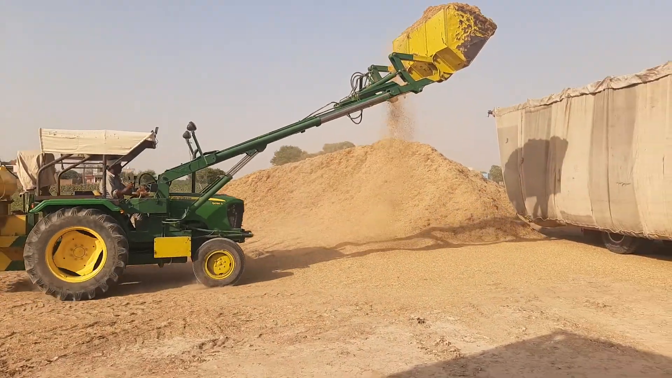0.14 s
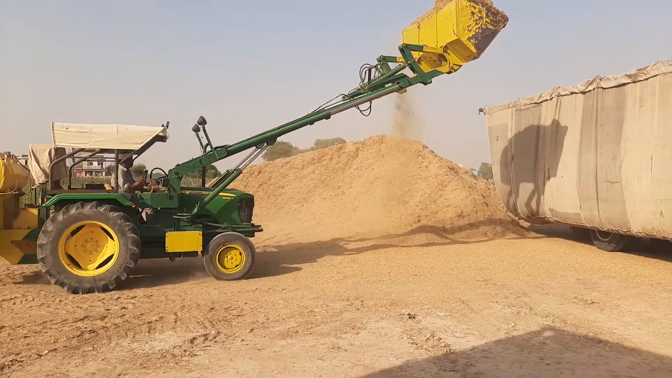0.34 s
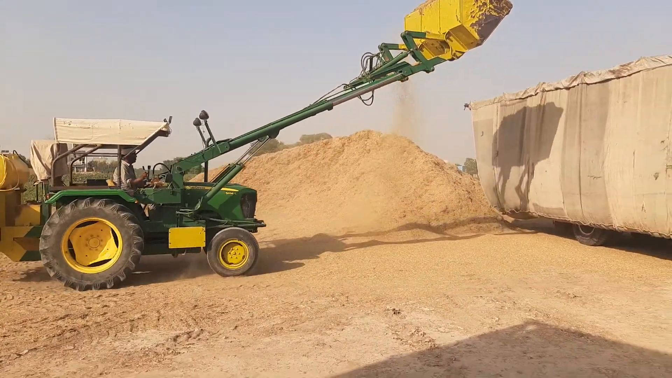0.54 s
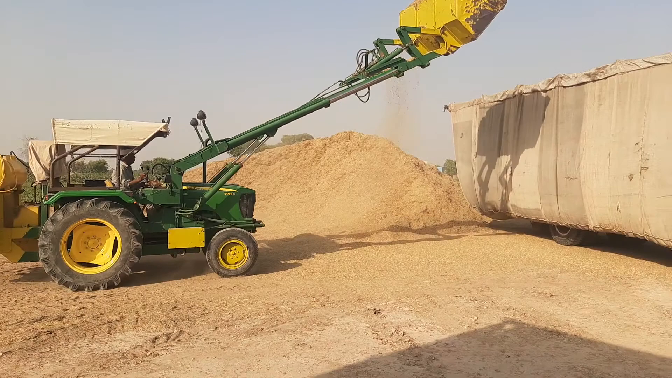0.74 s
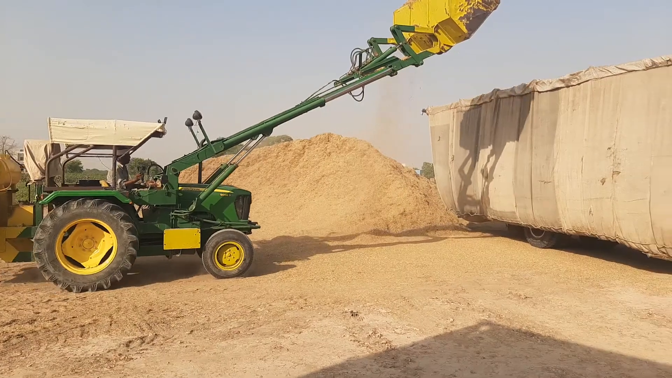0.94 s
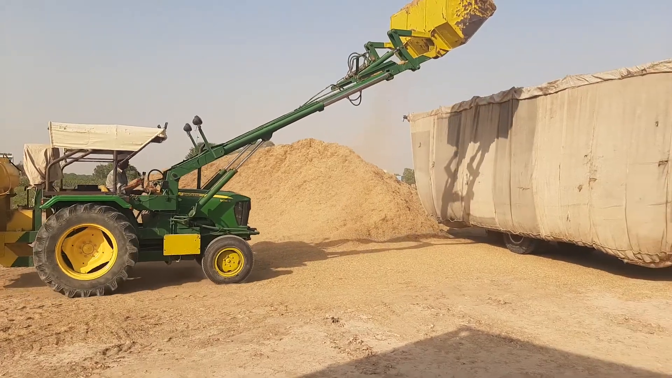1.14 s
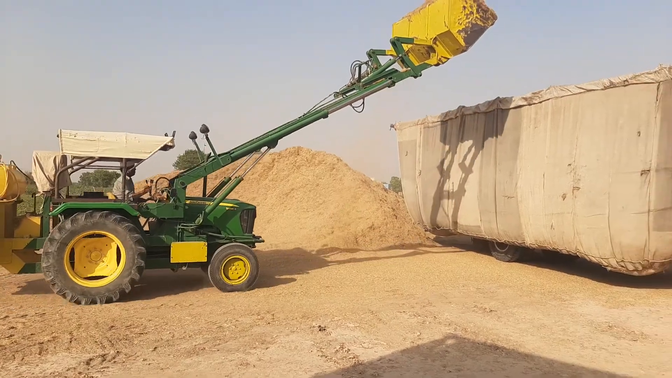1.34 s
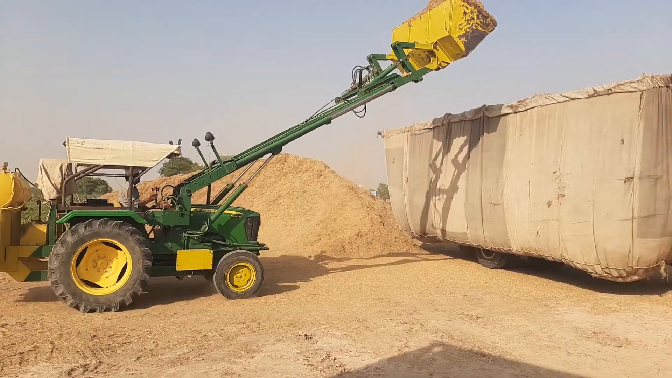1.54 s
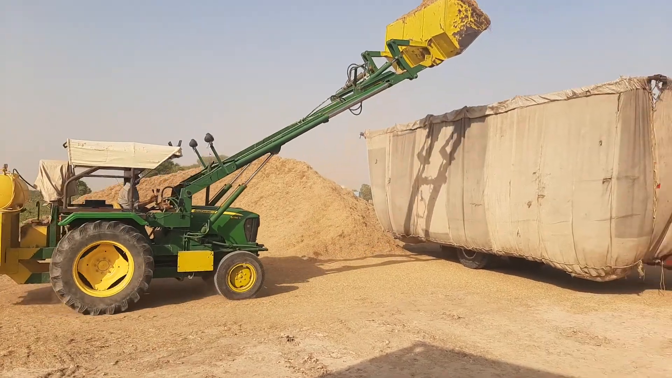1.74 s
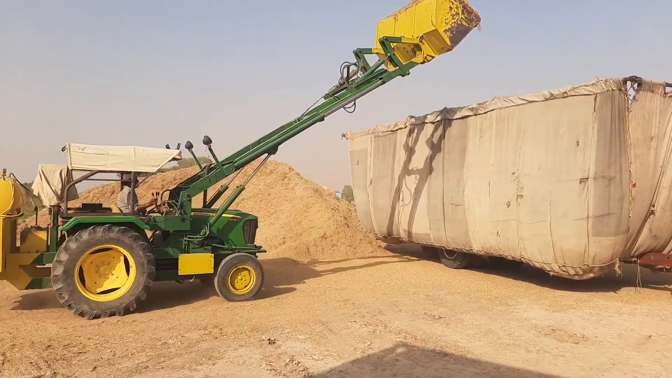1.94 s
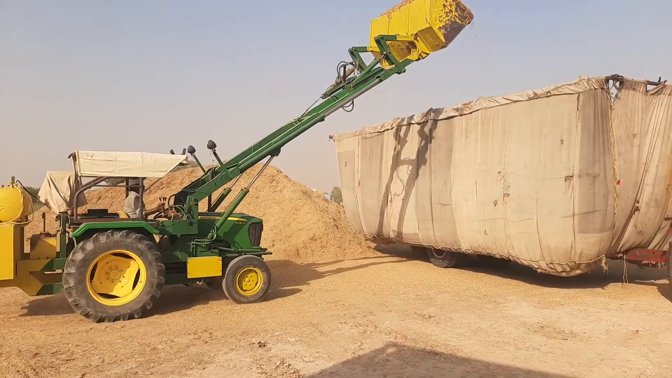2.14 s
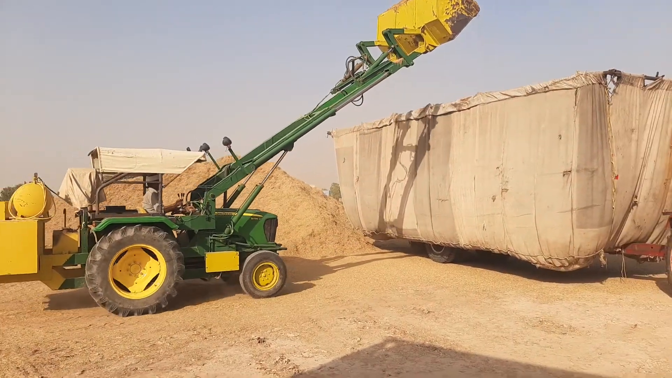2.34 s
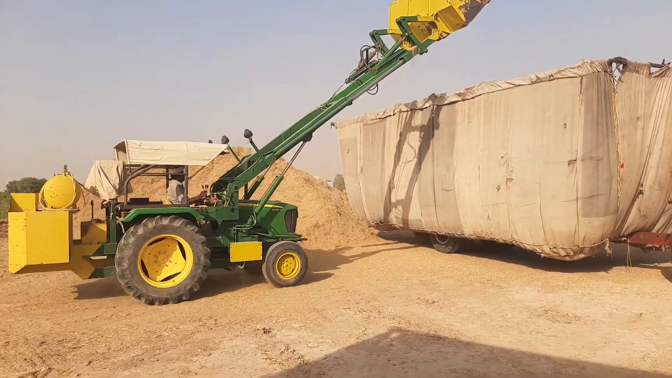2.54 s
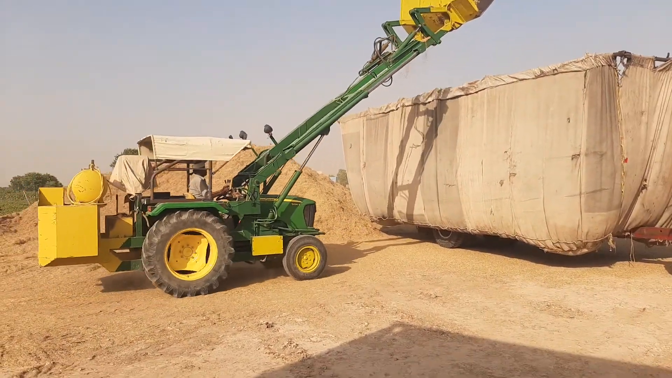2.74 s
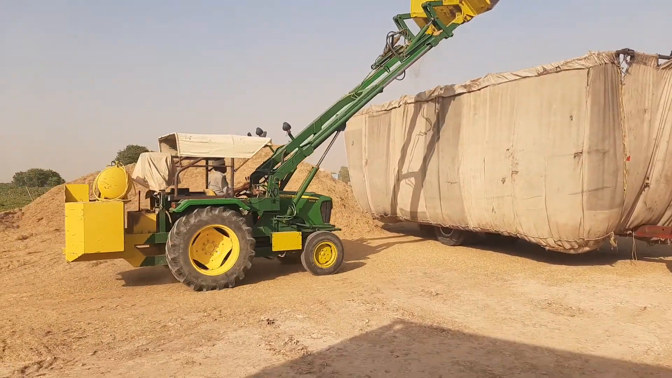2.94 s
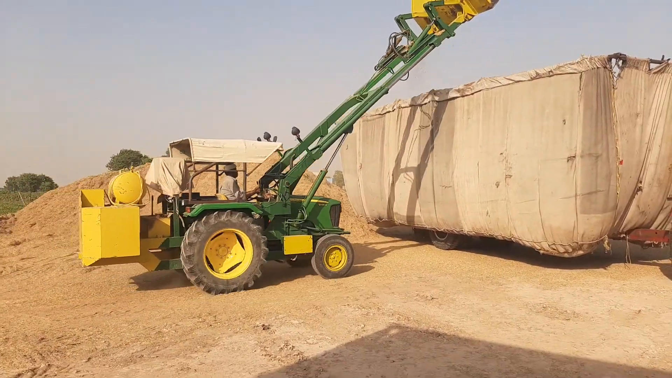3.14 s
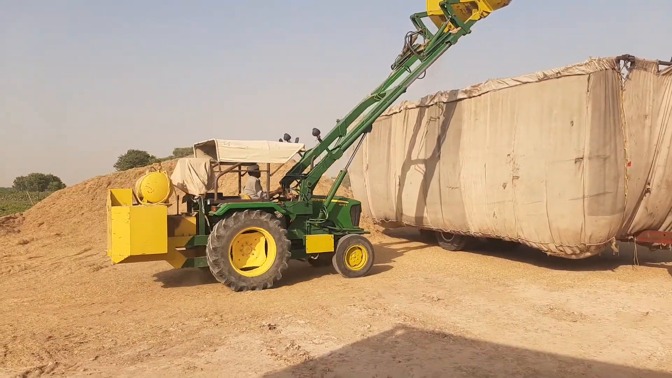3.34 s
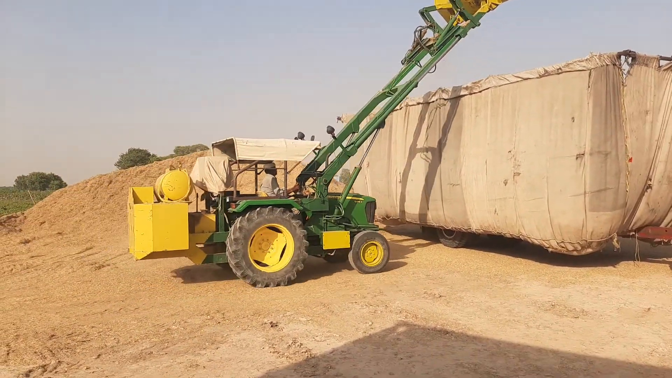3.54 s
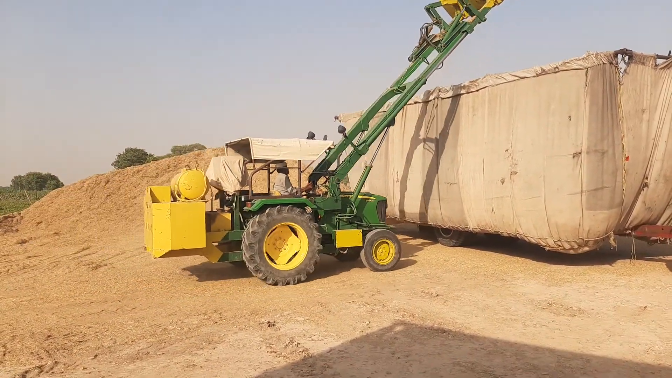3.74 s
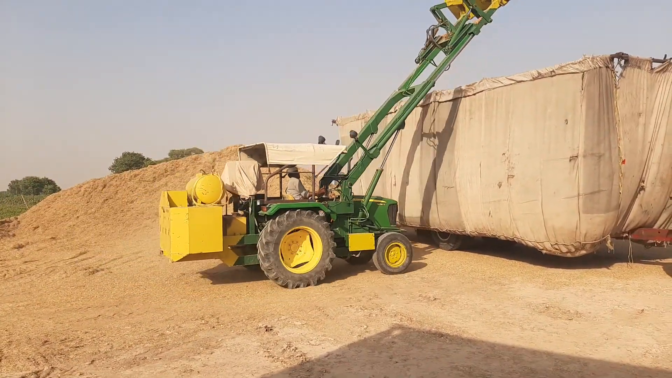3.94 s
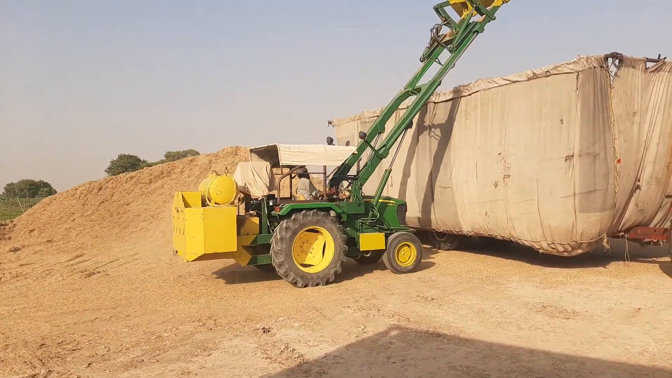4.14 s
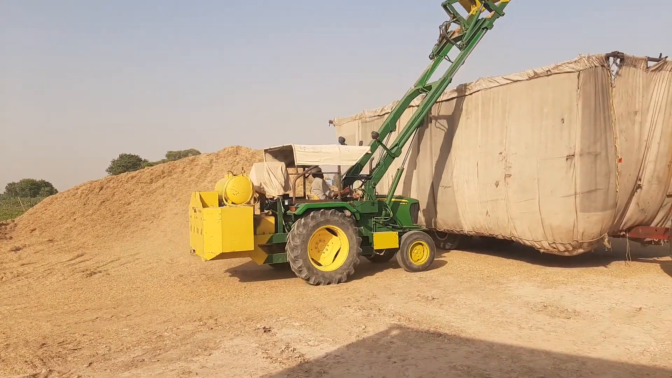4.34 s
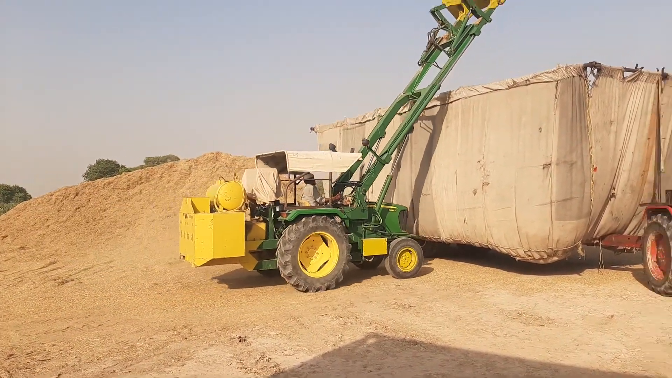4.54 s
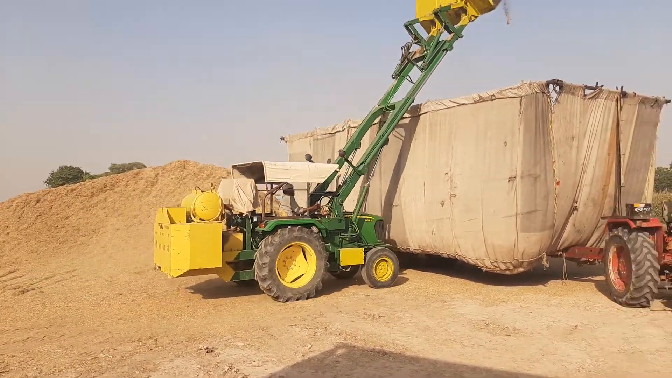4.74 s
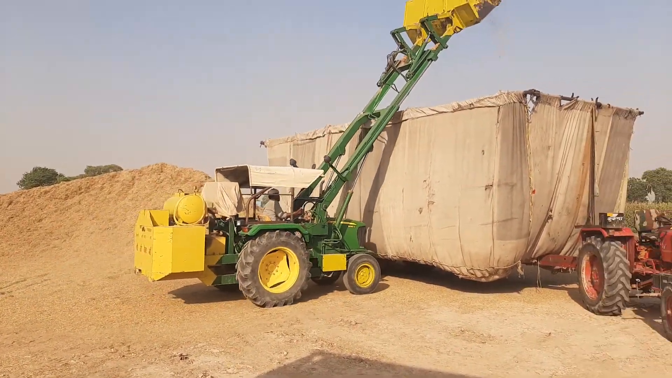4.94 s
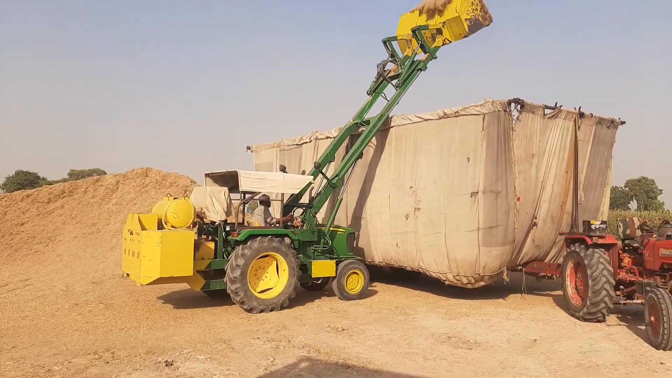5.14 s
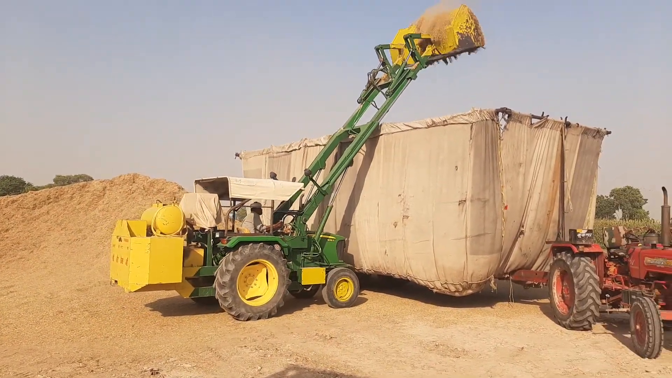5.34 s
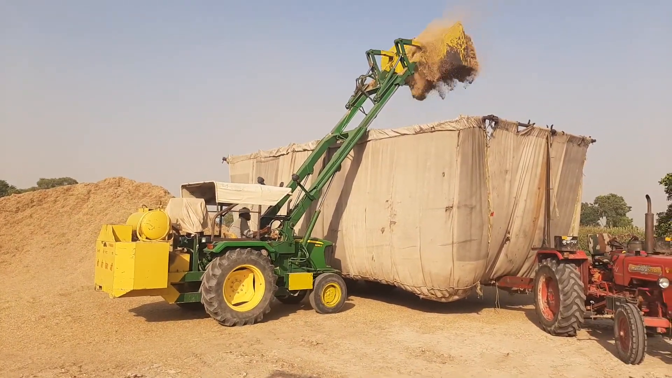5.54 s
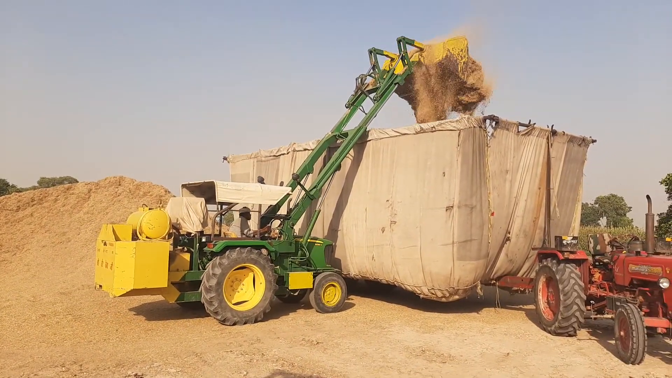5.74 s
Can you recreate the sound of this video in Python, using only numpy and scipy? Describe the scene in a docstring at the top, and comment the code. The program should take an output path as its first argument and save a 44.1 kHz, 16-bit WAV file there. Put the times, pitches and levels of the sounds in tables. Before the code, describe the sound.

In an open farm yard, a small three-cylinder tractor diesel pulls hard with a dense, buzzing exhaust throb, block clatter, ticking valves and wavering hydraulic whine. Just before four seconds the throttle is released and the pitch falls by half to an uneven idle. Loose loader joints clank dryly several times, then one faint squeak comes at the end. Handheld stereo microphone at moderate distance, dry, without reverberation.

```python
"""A three-cylinder tractor diesel pulls hard in an open farm yard, then the throttle is released
and it sinks to idle. Its exhaust throb is a set of sines locked to the firing rate, under a pump whine
of two gear tones. Rumble, block clatter and fan hiss are shaped noise that beats with the firings;
a loose tappet ticks, and the loader frame, struck by random knocks, clanks a few times as the load
comes off. One joint squeaks as a short sine."""
import sys
import numpy as np
from scipy import signal
from scipy.io import wavfile
from scipy.ndimage import uniform_filter1d

SR = 44100
rng = np.random.default_rng(int(sys.argv[2]) if len(sys.argv) > 2 else 0)


def nominal_scale(level):
    """Amplitude ratio for a level in decibels (scalar or array-like)."""
    x = np.asarray(level, float) / 20
    return 10 ** x


def file_out(sig):
    """Save sig as 16-bit WAV at sys.argv[1]."""
    # one column per channel
    cols = np.atleast_2d(sig).T
    # limit, then scale
    lim = np.clip(cols, -1, 1)
    pcm = np.round(lim * 32767).astype(np.int16)
    wavfile.write(sys.argv[1], SR, pcm)


N = 259308  # length in samples

RELEASE_S = 3.72  # the throttle is let go

# Governed speed under load, sagging as the loader works. Each row: time in seconds, firings per second in Hz.
GOVERNED_SPEED = [(0, 42.36), (.2, 42.23), (.75, 42.12), (.9, 42.03), (1.05, 41.67), (1.35, 42.02),
                  (1.5, 41.84), (1.8, 42.14), (1.95, 41.9), (2.2, 41.92), (2.4, 41.57), (2.7, 42.02),
                  (3.0, 41.95), (3.35, 41.36), (3.62, 41.38), (3.74, 40.7)]
# The tractor drives up to the trailer: times in seconds at which it is far, nearer, midway and close.
APPROACH_S = [0, 1.35, 2.202, 3.0]
# Strong exhaust lines. Each row: multiple of the firing rate, then level in dB when far, nearer, midway,
# close, just released and idling.
STRONG_LINES = [(1, -33, -34, -35, -34.5, -27.5, -68), (2, -19.5, -21.5, -24, -21, -30.5, -55),
                (3, -27.5, -25, -23.5, -25.5, -30, -47), (4, -21.5, -21, -24.5, -28, -40, -41),
                (5, -43, -45.5, -49, -40, -35, -46.5), (6, -40, -41, -44.5, -48, -41.5, -52.5),
                (11 / 3, -28.5, -29.5, -35.5, -35, -42, -62), (13 / 3, -28, -32, -38, -43, -40, -73),
                (14 / 3, -30.5, -31.5, -35.5, -36, -38, -66), (22 / 3, -45, -50, -45, -38.5, -48, -71),
                (9, -54, -66, -54, -47, -51, -62), (10, -67, -58, -41, -64, -55, -70.5)]
# Faint exhaust lines. Each row: multiple of the firing rate, level in dB pulling, level in dB idling.
FAINT_LINES = [(.33, -66, -70), (.67, -65, -76), (1.33, -45, -67), (1.67, -47, -67), (2.33, -45, -63),
               (2.67, -43, -61), (3.33, -43, -48), (5.33, -45, -51), (5.67, -46, -54), (6.33, -52, -46),
               (7, -51, -56), (7.67, -50, -57), (8.33, -48, -57), (9, -70, -56), (9.33, -51, -58),
               (9.67, -50, -55), (10, -70, -55), (11, -56, -63), (14, -70, -61), (17, -70, -56),
               (20, -70, -54)]
# Fuel taken again at idle as the bucket tips. Each row: time in seconds, gain in dB at the muffler resonance.
FUEL_PICKUP = [(4.9, -1), (5.1, 10.5), (5.22, 12), (5.36, 12), (5.46, 19), (5.58, 9.5), (5.72, 14.5),
               (5.88, 17)]
# Hydraulic pump whine, before its lean. Each row: time in seconds, upper tone in dB, lower tone in dB.
PUMP_TONES = [(0, -42.5, -39), (.48, -38.5, -41), (.7, -45.5, -49), (1.08, -33.5, -35.5),
              (1.32, -39.5, -46.5), (1.54, -41, -36.5), (1.68, -32.5, -39), (2.1, -41.5, -40.5),
              (2.4, -57, -36), (2.64, -46.5, -31), (3.12, -39, -28.5), (3.4, -37, -35),
              (3.62, -36.5, -29.5), (3.74, -34, -37), (3.84, -40.5, -40.5), (3.95, -55, -47),
              (4.45, -62, -35.5), (4.75, -62, -50)]
# Loose tappet. Each row: time in seconds, strength of a tick in dB.
TAPPET_TICKS = [(0, -26), (.3, -26.5), (1, -21.5), (1.8, -20.5), (2.1, -27.5), (3.7, -24), (4.2, -43)]
# Valve cover modes. Each row: frequency in Hz, relative level in dB, 60 dB decay time in seconds.
VALVE_COVER = [(1337, -0.5, 0.033), (1446, -4.5, 0.055), (2674, -18, 0.028)]
# Loader clanks. Each row: start in seconds, rms level in dB, length in seconds, frequency in Hz where
# the joint rings most, fall away from there in dB an octave.
LOADER_CLANKS = [(4.245, -38, .05, 780, 4), (4.377, -29.5, 0.025, 1000, 2), (4.405, -30, 0.029, 1200, 4),
                 (4.457, -33, 0.055, 1100, 1), (4.787, -34, .038, 1230, 9), (5.035, -38, .022, 1400, 12),
                 (5.772, -36, 0.023, 500, 5)]
# Loader frame modes. Each row: frequency in Hz, relative level in dB, 60 dB decay time in seconds.
LOADER_FRAME = [(210, -3, .04), (375, 0, .05), (435, -1, .05), (690, -4, .04), (800, -4, .04),
                (980, -6, .03), (1250, -4, .04), (1330, -4, .05), (1550, -4, .05), (2040, -8, .03),
                (2290, -9, .03)]
# A joint squeaks once: start in seconds, length in seconds, frequency in Hz, peak level in dB.
JOINT_SQUEAK = (5.812, .06, 1045, -43)
# Noise bands, before the jolts. Each row: time in seconds, rumble in dB, clatter in dB, hiss in dB.
NOISE_LEVELS = [(0, -43, -30, -42.5), (.87, -41.5, -30.5, -45), (1.4, -41, -30.5, -45),
                (1.85, -38.5, -30, -42.5), (2.6, -36.5, -29.5, -44), (3.67, -40.5, -28, -44.5),
                (3.78, -41, -32.5, -47), (4.3, -42, -33.5, -50), (4.68, -47.5, -37, -56.5),
                (4.9, -48, -37, -56.5), (5.19, -45.5, -34.5, -58), (5.35, -46.5, -34, -54),
                (5.6, -46, -32.5, -56), (5.86, -45, -33, -51)]
# Noise colour at full speed, far away. Each row: frequency in Hz, relative density in dB per Hz.
FAR_COLOUR = [(30, -38), (60, -14), (140, -4), (220, -8), (280, -9), (400, -16.5), (500, -22.5),
              (700, -5.5), (900, -11.5), (1080, -14), (1500, -15.5), (1720, -16), (2300, -16), (3800, -21),
              (5000, -26.5), (8700, -34), (12500, -28.5), (15500, -32)]
# Noise colour at full speed, driven up. Each row: frequency in Hz, relative density in dB per Hz.
NEAR_COLOUR = [(30, -38), (60, -5), (140, -8.5), (220, -12), (300, -15), (420, -9), (520, -24),
               (700, -13.5), (1050, -16), (1500, -14), (1720, -20.5), (2300, -17.5), (3500, -22),
               (4600, -28), (8700, -38), (12500, -33.5), (15500, -37.5)]
# Noise colour at idle. Each row: frequency in Hz, relative density in dB per Hz.
IDLE_COLOUR = [(33, -47), (55, 0), (140, -7.5), (220, -8), (300, -3), (420, -15), (520, -17), (700, -13),
               (1050, -20), (1500, -22.5), (1720, -25.5), (2300, -20), (3500, -20), (4500, -28),
               (8700, -34), (12500, -32), (15500, -36)]
# Engine block resonances. Each row: frequency in Hz, width in Hz, boost in dB.
BLOCK_RESONANCES = [(1545, 75, 9), (2036, 80, 9.5), (2697, 80, 6), (840, 40, 4), (2275, 60, 4),
                    (750, 60, 4), (3930, 150, 3)]
# The noise swells as the loader jolts. Each row: middle in seconds, length in seconds, change of rumble,
# of clatter and of hiss in dB.
LOADER_JOLTS = [(3.853, .06, 0.5, 2.5, -0.5), (4.41, .06, 5, 2.5, 1), (4.48, 0.029, 2, 3, 3),
                (4.566, 0.083, 3.5, -1, 3.5), (4.804, 0.044, 4, 0, -1), (5.44, 0.12, 3, 2, 3),
                (5.84, 0.069, 2, 0.5, 0.5)]
# Likeness of the noise at the two ports. Each row: frequency in Hz, left-right likeness from 0 to 1.
PORT_LIKENESS = [(60, 1), (345, .98), (860, .85), (1050, .6), (1400, .55), (1800, .4), (2800, .5),
                 (15000, .4)]
# Lean of the noise. Each row: frequency in Hz, left minus right in dB.
PORT_LEAN = [(60, 3), (500, -5.5), (700, 5.5), (1000, -4.5), (1400, 2), (1700, -3.5), (3400, -1),
             (8000, -3.5), (11000, -0.5), (14000, -8)]
# Treble arrival. Each row: time in seconds, lead at the left port in ms, share of its likeness that remains.
TREBLE_LEAD = [(0, .45, 1), (.95, .45, 1), (1.15, .14, .7), (3.0, .08, .4), (4.2, .03, .5), (5.88, .01, .6)]


def evened(x):
    """Scales to rms 1."""
    return x / np.sqrt(np.mean(x ** 2) + 1e-20)


def read(points, hz):
    """Reads a spectrum on a log-frequency axis."""
    f, value = np.transpose(points)
    return np.interp(np.log(hz + 1), np.log(f + 1), value)


def curves(rows, t):
    """Columns of a table read at times t."""
    s, *columns = np.transpose(rows)
    return [np.interp(t, s, column) for column in columns]


def wander(hz, count):
    """Slow random curves of rms 1: noise at 40 points a second, smoothed below hz."""
    rate = 40
    steps = rng.standard_normal((round(N / SR * rate) + 3, count)).T
    smooth = signal.lfilter([1], [1, -np.exp(-2 * np.pi * hz / rate)], steps)
    at = np.arange(N) / SR * rate
    return [evened(np.interp(at, np.arange(len(row)), row)) for row in smooth]


def tone(turns, db):
    """A sine of rms level db."""
    return np.sqrt(2) * nominal_scale(db) * np.cos(2 * np.pi * turns)


def speed(t):
    """Firings per second: governed, then falling freely to a hunting idle."""
    fall_hz_per_s, idle_hz, catch_hz = 20.56, 19.1, 2.3
    hunt_hz, hunt_period_s, hunt_top_s = .28, .37, 5.51
    fall_start_s, fall_start_hz = GOVERNED_SPEED[-1]
    falling_hz = fall_start_hz - fall_hz_per_s * (t - fall_start_s)
    free_hz = np.minimum(curves(GOVERNED_SPEED, t)[0], falling_hz)
    # the governor catches the fall softly
    caught_hz = idle_hz + catch_hz * np.log1p(np.exp((free_hz - idle_hz) / catch_hz))
    settled = free_hz < idle_hz - 3 * catch_hz
    return caught_hz + settled * hunt_hz * np.cos(2 * np.pi * (t - hunt_top_s) / hunt_period_s)


def pace(firing_hz):
    """0 at idle, 1 at full speed."""
    return np.clip((firing_hz - 20) / 21, 0, 1)


def exhaust_lines(t, fast):
    """Order and level of each line: firing orders and the lines between them, from load to idle."""
    fuel_cut_s = .03
    linger = .85  # below 1, the lines stay strong well into the fall of speed
    coasting_db = -8 * 4 * fast * (1 - fast)  # no fuel burns while the speed falls
    released = np.clip((t - RELEASE_S) / fuel_cut_s + .5, 0, 1)
    lines = []
    for order, *approach_db, released_db, idling_db in STRONG_LINES:
        pulling_db = np.interp(t, APPROACH_S, approach_db)
        free_db = idling_db + fast ** linger * (released_db - idling_db)
        lines.append((round(3 * order) / 3, (1 - released) * pulling_db + released * free_db))
    for order, pulling_db, idling_db in FAINT_LINES:
        lines.append((round(3 * order) / 3, fast * pulling_db + (1 - fast) * idling_db + coasting_db))
    return lines


def exhaust(t):
    """Sines locked to the crank, delayed in phase by the muffler resonance and shaken a little."""
    shake_db, shake_turns = 1., .02
    puff_at = .83  # share of a firing at which the puff falls
    rasp_share, thump_share = .66, .48  # shares of the pickup gain for the highest and lowest orders
    boom_width_hz = 18  # how far from the resonance the pickup gain reaches
    firing_hz = speed(t)
    firings = np.cumsum(firing_hz) / SR - puff_at
    fast = pace(firing_hz)
    lines = exhaust_lines(t, fast)
    # cooler gas at idle lowers the resonance
    muffler_hz, width_hz = 106 + 37 * fast, 10 - 4 * fast
    pickup_db = curves(FUEL_PICKUP, t)[0]
    shakes = wander(hz=4.3, count=2 * len(lines))
    out = 0
    for (order, db), turn_shake, level_shake in zip(lines, shakes[::2], shakes[1::2]):
        hz = order * firing_hz
        # lines above the resonance lag half a turn
        lag = np.arctan2(width_hz * hz, muffler_hz ** 2 - hz ** 2) / (2 * np.pi)
        if order > 9.9:
            share = rasp_share
        elif order < 3.1:
            share = thump_share
        else:
            share = 1 / (1 + ((hz - muffler_hz) / boom_width_hz) ** 2)
        # firings uneven in time, not in strength: a quarter turn
        uneven = 0 if order == round(order) else 1 / 4
        # the strong whole orders hold steady under load and hunt at idle
        loose = 2 - 1.8 * fast if order in (1, 2, 3, 4) else 1
        turns = order * firings - lag + uneven + loose * shake_turns * turn_shake
        out += tone(turns, db + pickup_db * share + loose * shake_db * level_shake)
    return out


def exhaust_at_ports(t):
    """The exhaust reaches the left port first and a little stronger."""
    lead_s, lean_db = .00017, .3
    puffs = exhaust(t)
    late = np.interp(t - lead_s, t, puffs)
    return np.array([puffs * nominal_scale(lean_db / 2), late / nominal_scale(lean_db / 2)])


def pump(t):
    """Two gear tones, 16 and 8 to a firing, that end as the engine slows; the lower one sits to the right."""
    shake_turns, lean_db = .022, -3
    upper_db, lower_db = curves(PUMP_TONES, t)
    turns = 8 * np.cumsum(speed(t)) / SR + shake_turns * wander(hz=3, count=1)[0]
    fade_db = -200 * np.maximum(t - PUMP_TONES[-1][0], 0)
    side_db = np.array([[lean_db / 2], [-lean_db / 2]])
    upper = tone(2 * turns, upper_db + fade_db - side_db / 2)
    lower = tone(turns, lower_db + fade_db + side_db)
    return upper + lower


def tappet(t):
    """One tick in every engine cycle of three firings rings the valve cover."""
    tick_at = .235  # share of a cycle at which the tick falls
    cycles = np.floor(np.cumsum(speed(t)) / SR / 3 - tick_at)
    tick_db = curves(TAPPET_TICKS, t)[0] + 1.5 * rng.standard_normal(N)
    ticks = np.diff(cycles, prepend=cycles[0]) * nominal_scale(tick_db)
    after = t[:2500]
    ring = sum(nominal_scale(db - 60 * after / t60) * np.sin(2 * np.pi * hz * after) for hz, db, t60 in VALVE_COVER)
    ring *= 1 - np.exp(-after / .002)  # soft onset
    return np.array([[1.1], [.9]]) * signal.oaconvolve(ticks, ring)[:N]


def clanks(t):
    """Loose loader joints rattle in short bursts of random knocks that ring the frame."""
    knocks = rng.standard_normal((N, 2)).T * (rng.random(N) < 4000 / SR)  # about 4000 a second
    knocks[1] = .77 * knocks[0] + .5 * knocks[1]  # partly alike at the two ports
    out, after = np.zeros((2, N)), t[:6000]
    for start_s, db, length_s, joint_hz, fall_db in LOADER_CLANKS:
        ring = 0
        for hz, mode_db, t60 in LOADER_FRAME:
            decay_db = mode_db - fall_db * abs(np.log2(hz / joint_hz)) - 60 * after / t60
            ring = ring + nominal_scale(decay_db) * np.sin(2 * np.pi * hz * after)
        start = round(start_s * SR)
        burst = knocks[:, start:][:, :4000]
        u = t[:burst.shape[1]]
        burst = burst * np.exp(-(u / length_s) ** 3) * np.minimum(u / .002, 1)
        sound = signal.fftconvolve(burst, ring[None] / np.linalg.norm(ring), axes=1)
        gain = nominal_scale(db) / sound[:, :round(length_s * SR)].std()
        part = out[:, start:][:, :sound.shape[1]]
        part += gain * sound[:, :part.shape[1]]
    return out


def squeak(t):
    """A brief, nearly pure tone that swells and fades."""
    start_s, length_s, hz, db = JOINT_SQUEAK
    u = np.clip((t - start_s) / length_s, 0, 1)
    return tone(hz * t, db) * np.sqrt(np.sin(np.pi * u))


def noise_colour(at, hz):
    """Noise spectrum in dB: echoes off ground and trailer shift as the tractor drives up, the block rings."""
    fast = pace(speed(at))
    nearer = np.clip(at / 2.2, 0, 1)
    pulling_db = nearer * read(NEAR_COLOUR, hz) + (1 - nearer) * read(FAR_COLOUR, hz)
    colour_db = fast * pulling_db + (1 - fast) * read(IDLE_COLOUR, hz)
    return colour_db + sum(db / (1 + (2 * (hz - f) / w) ** 2) for f, w, db in BLOCK_RESONANCES)


def noise_level(at, hz, colour_db):
    """Correction in dB that brings rumble, clatter and hiss to their levels, with the loader's jolts."""
    bands = (430, 640), (900, 4000), (6000, 15000)  # Hz between which each level is set
    within = [10 * np.log10((nominal_scale(colour_db) ** 2 * (hz > lo) * (hz < hi)).sum(0)) for lo, hi in bands]
    jolts_db = sum(np.outer(changes_db, np.exp(-(2 * (at - s) / length_s) ** 2))
                   for s, length_s, *changes_db in LOADER_JOLTS)
    rumble_db, clatter_db, hiss_db = np.array(curves(NOISE_LEVELS, at)) - within + jolts_db
    low, high = 1 / (1 + (hz / 850) ** 6), 1 / (1 + (5000 / (hz + 1)) ** 4)
    return low * rumble_db + high * hiss_db + (1 - low - high) * clatter_db


def noise_at_ports(at, hz, left, other):
    """Spreads noise over two ports: a lead, a lean and a likeness that vary with frequency."""
    bass_lead_s = .00009
    lead_ms, remains = curves(TREBLE_LEAD, at)
    around = 1 / (1 + (hz / 1850) ** 12)  # long waves bend round the recorder's case
    same = np.clip(read(PORT_LIKENESS, hz) * (around + (1 - around) * remains), -1, 1)
    lead_s = around * bass_lead_s * (1 + (hz / 1300) ** 2) + (1 - around) * lead_ms / 1000
    right = same * left * np.exp(-2j * np.pi * hz * lead_s) + np.sqrt(1 - same ** 2) * other
    lean = nominal_scale(read(PORT_LEAN, hz) / 2)
    # unlike ports partly cancel in their mean, so they are raised
    mid_share = np.sqrt(2 / (1 + same * np.cos(2 * np.pi * hz * lead_s)))
    return np.array([left * lean, right / lean]) * mid_share


def racket(t):
    """Rumble, clatter and fan hiss: random short-time spectra, beating with the firings."""
    patchy_db, flicker_db = .5, .38
    beat, valves, cycle = .096, .054, .0092  # depths once and twice a firing, and once in three firings
    frames = N // 256 + 5
    hz = np.fft.rfftfreq(1024, 1 / SR)[:, None]
    at = np.arange(frames) * 256 / SR
    a, b, c, d, grain = rng.standard_normal((frames, 513, 5)).T
    flicker = evened(uniform_filter1d(grain[:, ::-1], size=400, axis=0))  # broad in frequency
    patches = uniform_filter1d(uniform_filter1d(grain, size=12, axis=0), size=14, axis=1)
    patches = evened(patches)
    colour_db = noise_colour(at, hz)
    level_db = noise_level(at, hz, colour_db)
    spectra = noise_at_ports(at, hz, a + 1j * b, c + 1j * d)
    spectra *= nominal_scale(colour_db + level_db + patchy_db * patches + flicker_db * flicker)
    noise = signal.istft(spectra, nperseg=1024, noverlap=768)[1][:, :N] * np.sqrt(2 / 3)
    turn = 2 * np.pi * np.cumsum(speed(t)) / SR
    return noise * np.exp(beat * np.cos(turn) + valves * np.cos(2 * turn) + cycle * np.cos(turn / 3))


def scene():
    """All sources as heard at the two microphone ports."""
    t = np.arange(N) / SR
    engine = exhaust_at_ports(t) + pump(t) + tappet(t)
    loader = clanks(t) + squeak(t)
    return engine + loader + racket(t)


def top_cut(x):
    """Nothing passes above the cut-off."""
    return signal.sosfilt(signal.butter(12, 15690, fs=SR, output="sos"), x)


def record(dry):
    """The finished mix as the recorder keeps it."""
    return top_cut(dry)


dry = scene()
out = record(dry)
file_out(out)
```